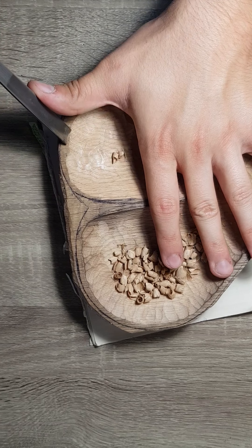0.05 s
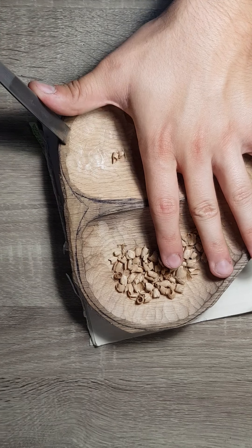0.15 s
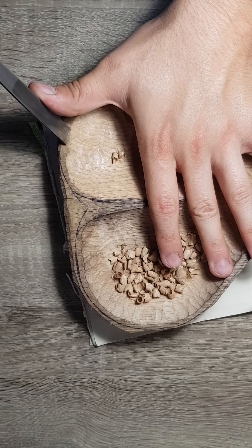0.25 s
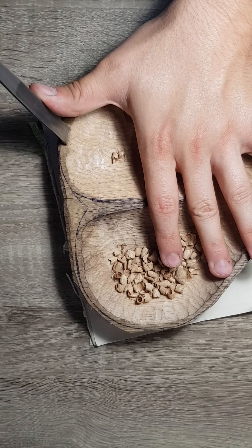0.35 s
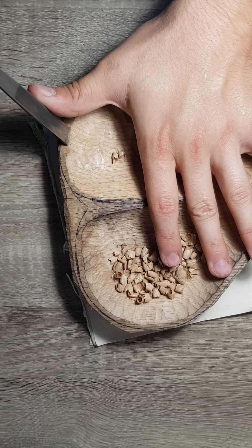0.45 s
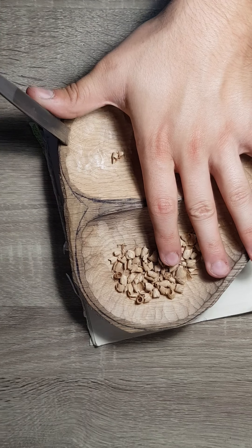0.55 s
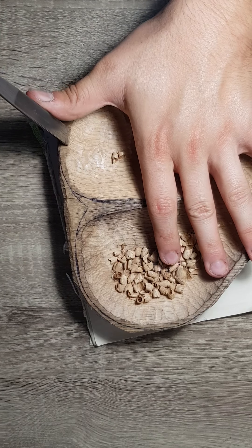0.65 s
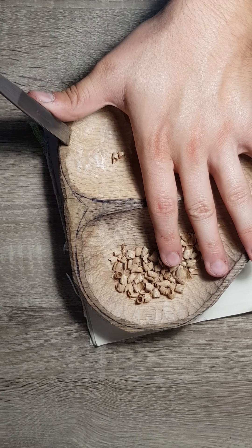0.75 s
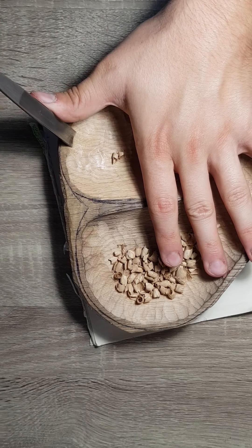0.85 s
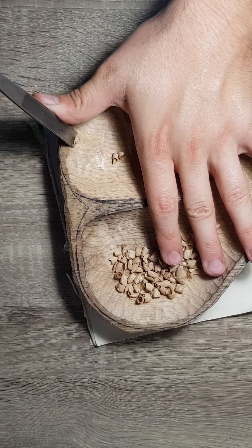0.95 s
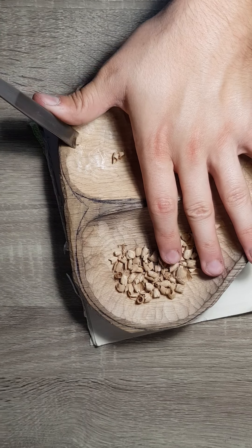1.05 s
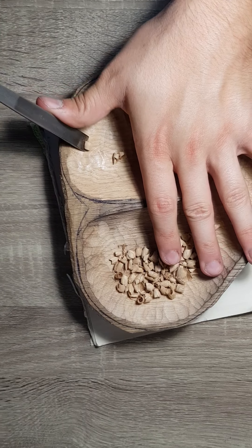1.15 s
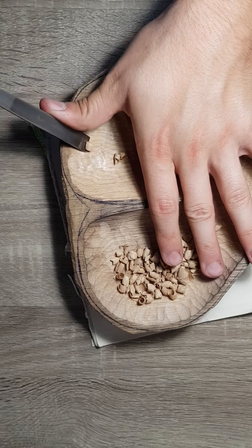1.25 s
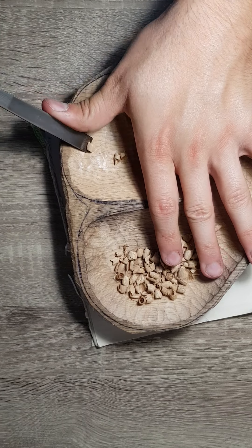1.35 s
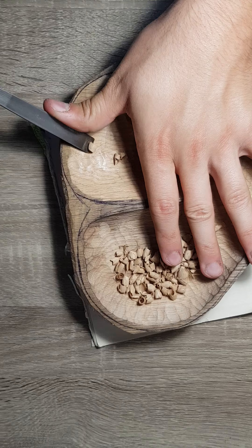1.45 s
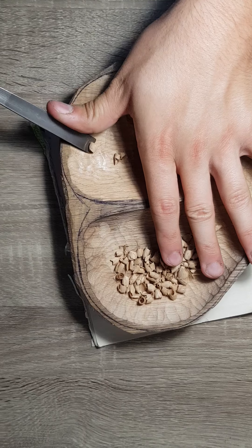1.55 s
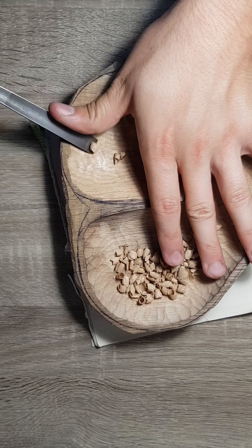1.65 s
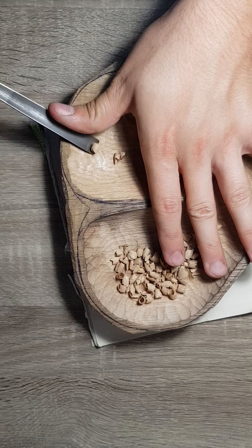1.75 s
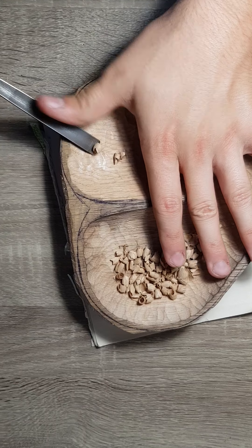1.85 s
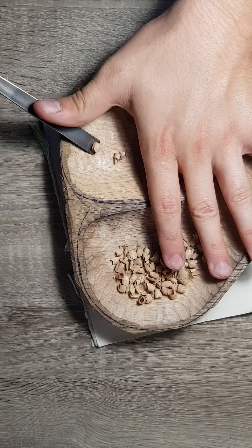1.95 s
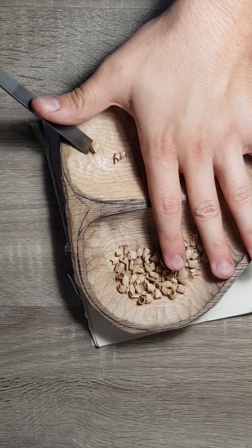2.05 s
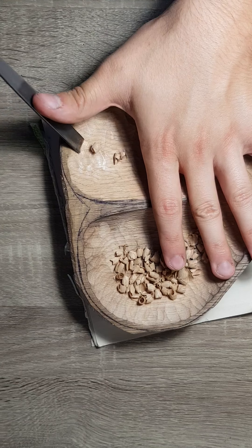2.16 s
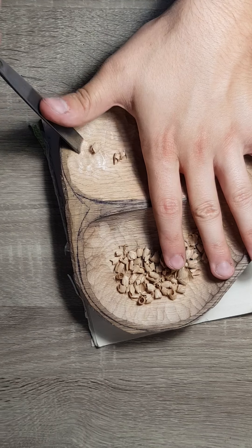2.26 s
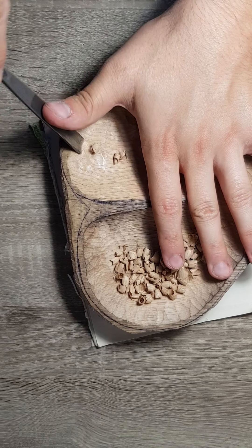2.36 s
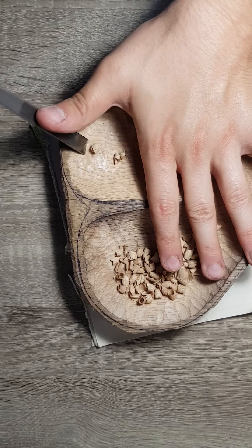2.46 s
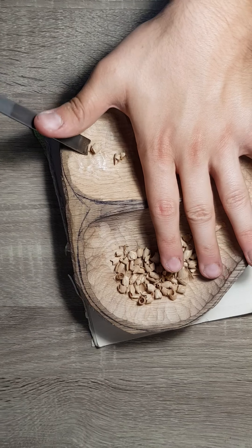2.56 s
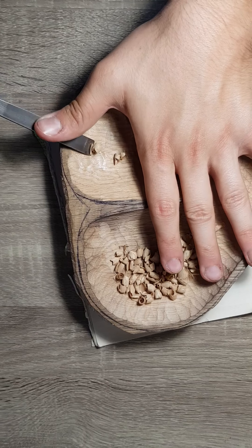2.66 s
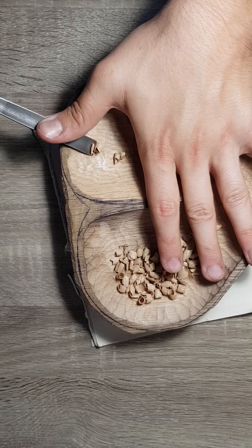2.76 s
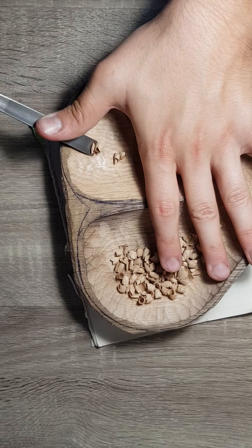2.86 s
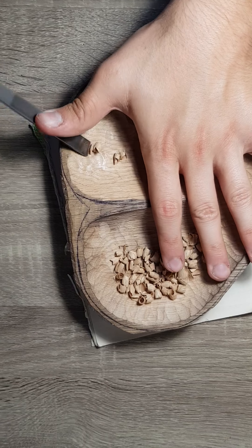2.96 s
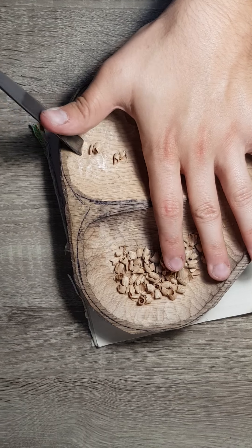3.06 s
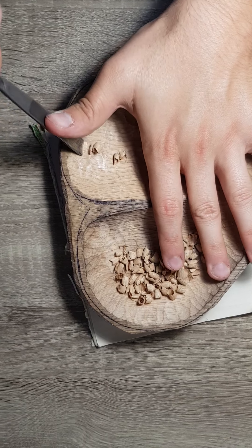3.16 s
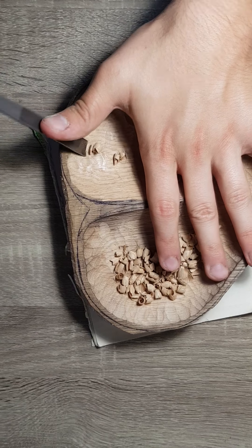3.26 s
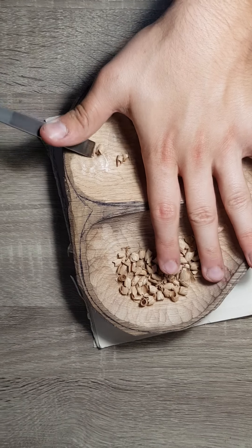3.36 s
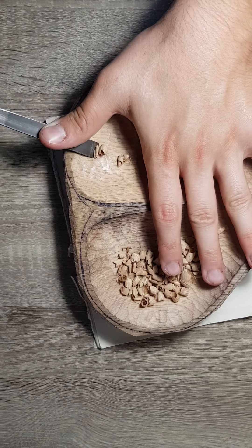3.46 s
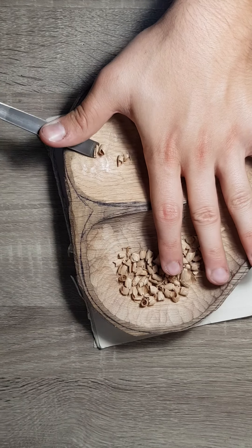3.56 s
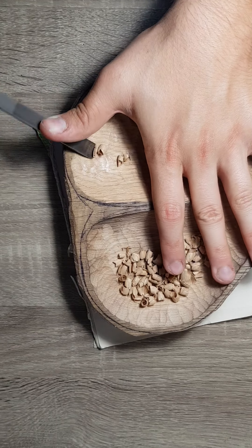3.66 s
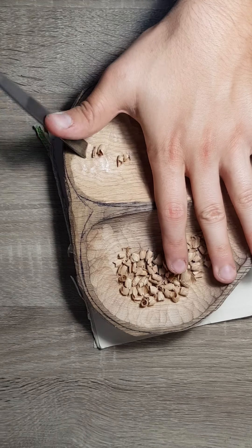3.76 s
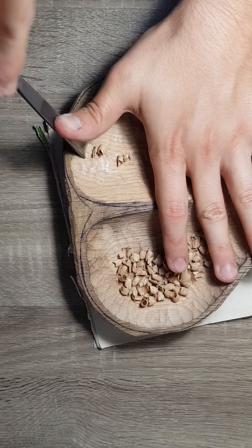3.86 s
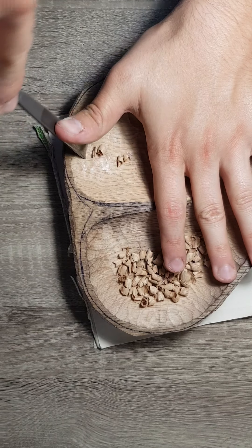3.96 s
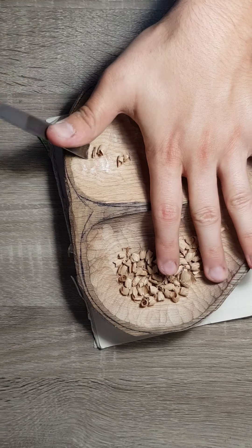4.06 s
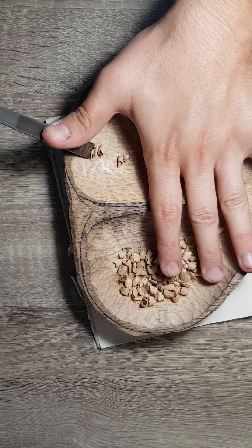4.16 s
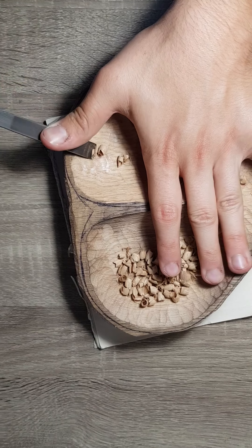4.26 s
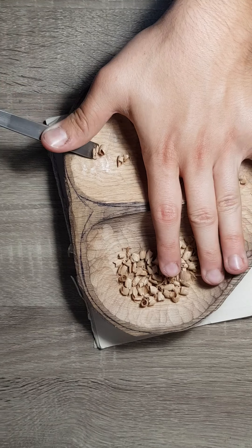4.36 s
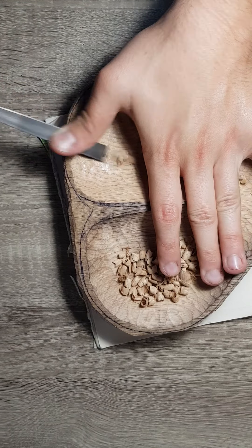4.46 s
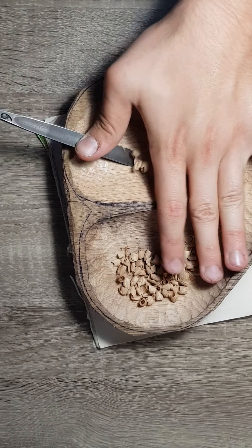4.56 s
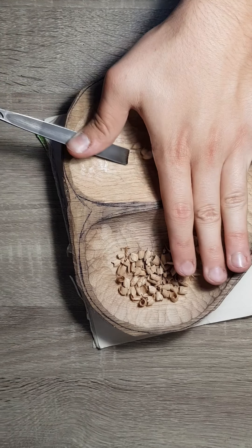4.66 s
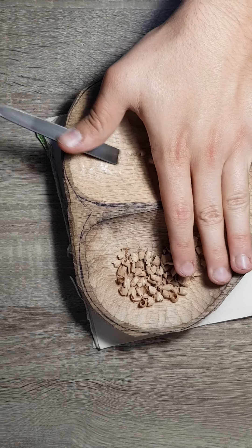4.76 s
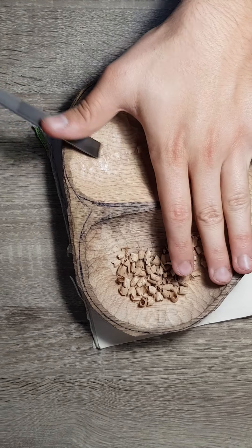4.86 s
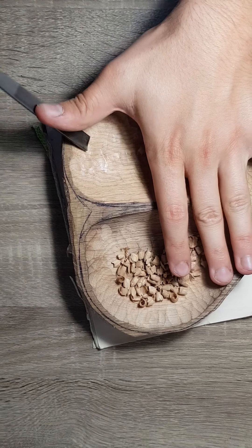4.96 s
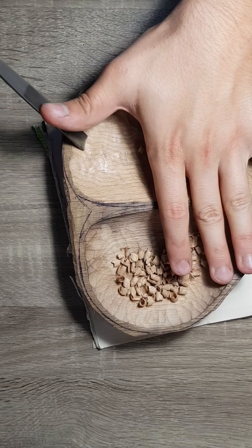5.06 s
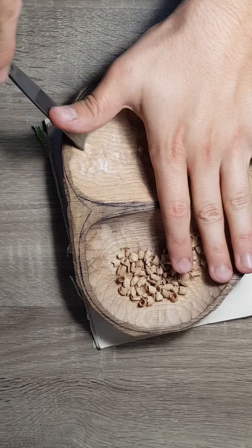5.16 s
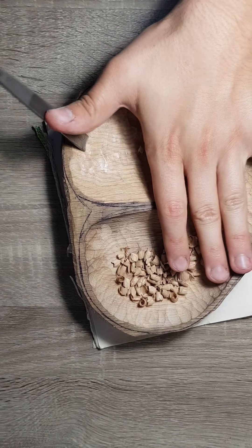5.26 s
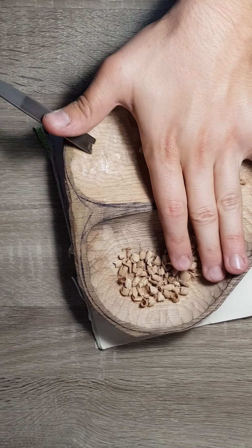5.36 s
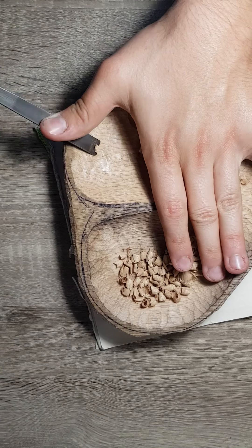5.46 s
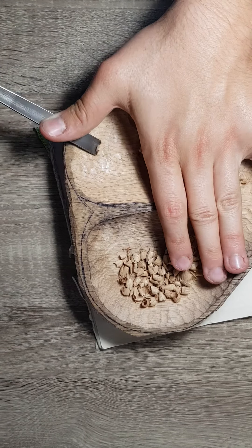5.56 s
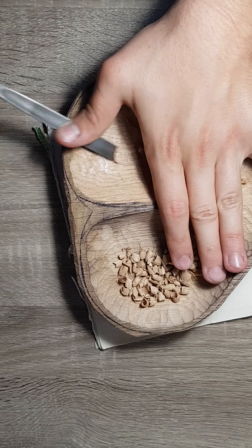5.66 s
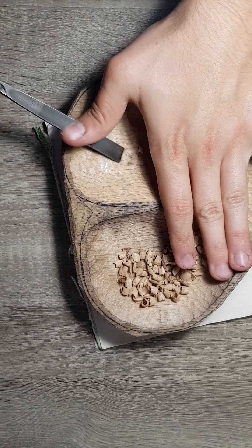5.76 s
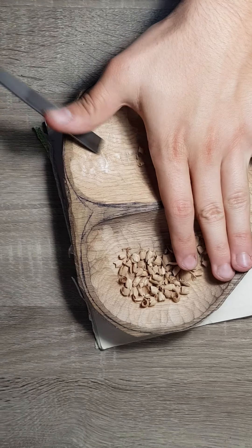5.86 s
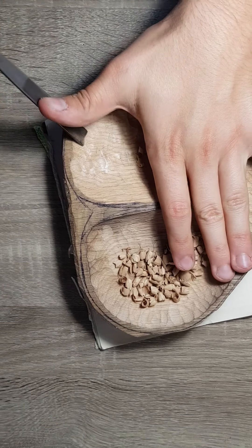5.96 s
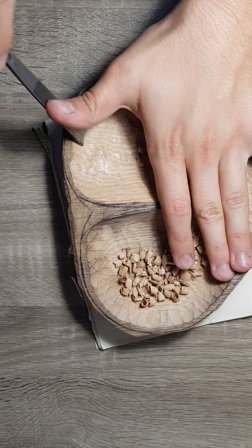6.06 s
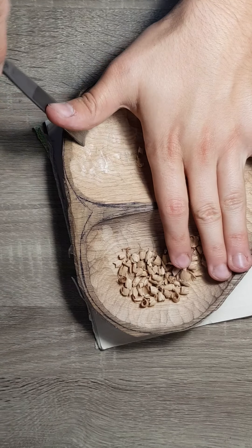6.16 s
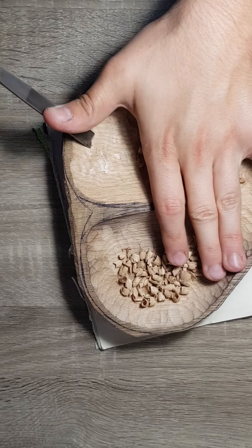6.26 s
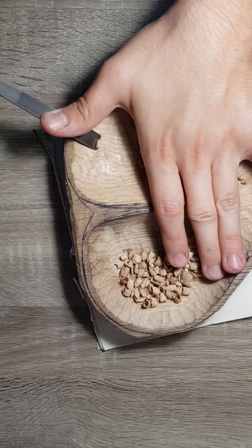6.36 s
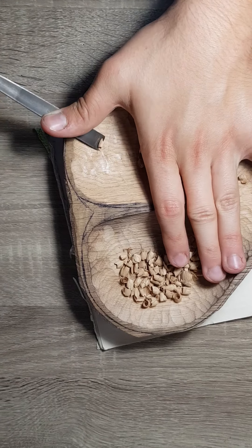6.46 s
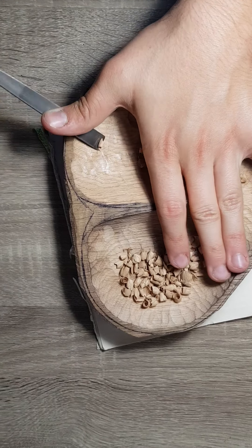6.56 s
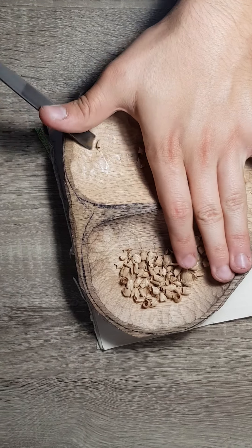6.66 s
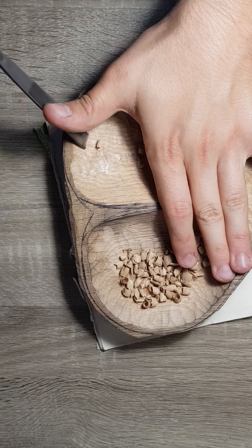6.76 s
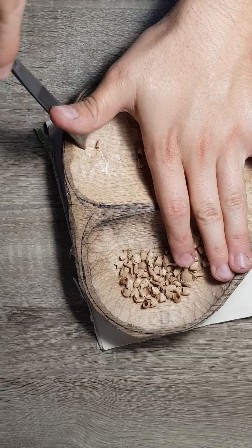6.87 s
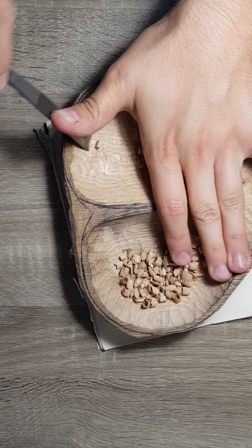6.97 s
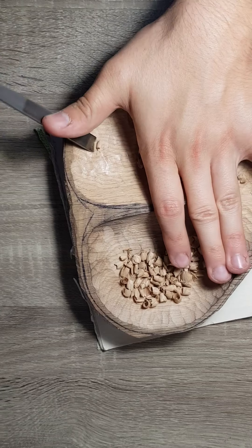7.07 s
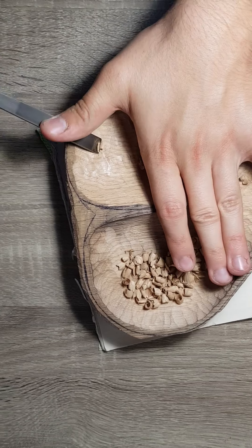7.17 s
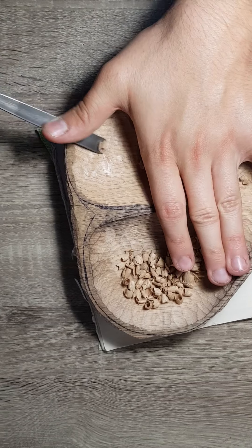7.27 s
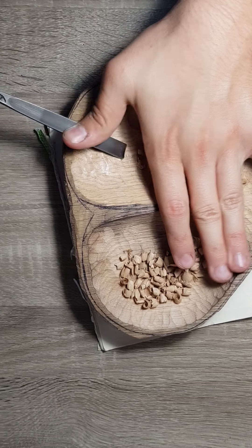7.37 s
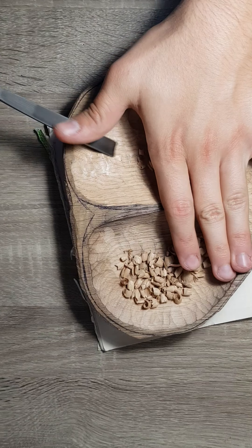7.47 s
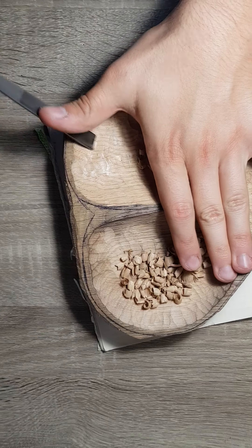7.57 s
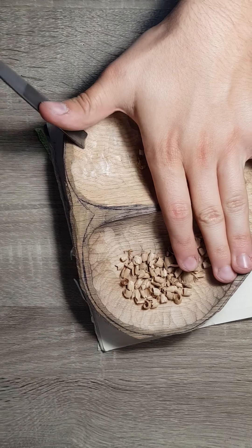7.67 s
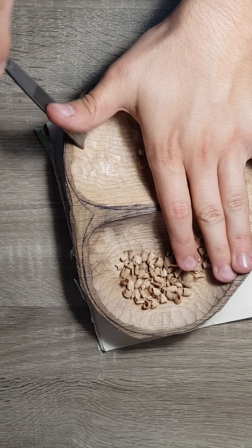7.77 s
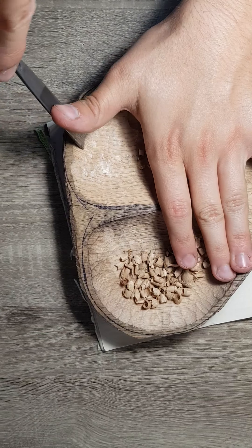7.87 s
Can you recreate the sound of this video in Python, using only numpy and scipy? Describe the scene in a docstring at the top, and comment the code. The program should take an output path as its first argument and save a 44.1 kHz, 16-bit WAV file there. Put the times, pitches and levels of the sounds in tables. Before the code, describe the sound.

A hand-pushed gouge bites into a wooden blank with hollow, crunchy thunks, then scattered rasping pushes and small steel ticks in a quiet room.

```python
"""In a small quiet room a hand-pushed gouge works a wooden bowl blank on a table top, close to a phone's two mics.
A run of heavy jolts comes first, from 0.8 to 1.5 s: blows ring the hollow table's modes, noise bursts crack fibres.
From 2.4 s there are scattered pushes with rasping slips; from 3 s the steel shank ticks and sings as ringing modes.
Hiss creeps up to 4.2 s; taps crowd near 4.8 s, the strongest rasps follow 5.3 s, and more taps come near the end.
Each push is a level curve; decaying noise makes the room's answer, steady filtered noise its rumble and the hiss."""
import sys
import numpy as np
from scipy import signal
from scipy.fft import rfft, irfft
from scipy.io import wavfile
from scipy.ndimage import uniform_filter1d, map_coordinates

SR = 44100
rng = np.random.default_rng(int(sys.argv[2]) if len(sys.argv) > 2 else 0)


def master_out(mix):
    """Clip the mix to full scale and print it as 16-bit PCM to the path in sys.argv[1]."""
    frames = np.transpose(np.atleast_2d(mix))
    ceiling = np.clip(frames, -1, 1)
    pcm = np.round(ceiling * 32767).astype(np.int16)
    wavfile.write(sys.argv[1], SR, pcm)


N = 349272  # samples, 7.92 s

# Jolts of the edge, close to the mics.
# Each row: start in seconds, crack level in dB, thump level in dB, splinter level in dB.
JOLTS = [(0.8, -50, -41.5, -101), (0.84, -38, -21, -70), (0.861, -35.5, -15, -62),
         (0.899, -33.5, -11.5, -61), (0.91, -33.5, -9.5, -57.5), (0.936, -39.5, -8.5, -61),
         (1.092, -25, -1.5, -56), (1.113, -27.5, -14, -57), (1.134, -33, -9, -55.5),
         (1.165, -28, -5, -48.5), (1.192, -22, -6, -50), (1.217, -31.5, -18, -66.5),
         (1.328, -31.5, -10.5, -62.5), (1.485, -49.5, -46, -104), (1.546, -51, -65.5, -100),
         (1.886, -71.5, -52, -94), (2.118, -60.5, -45, -96.5), (2.477, -50, -28.5, -66),
         (2.503, -41, -17, -57.5), (2.559, -41, -35, -67), (2.999, -65, -39, -94.5),
         (3.252, -54, -18, -60.5), (3.341, -42.5, -36, -67), (3.549, -50.5, -64.5, -75),
         (4.128, -32.5, -8, -53), (4.143, -36, -10.5, -61), (4.307, -44, -35, -47.5),
         (4.325, -51, -38, -53), (4.492, -43.5, -52, -54), (4.536, -40, -35.5, -59),
         (4.584, -41, -24, -55.5), (5.342, -42.5, -15, -58), (5.362, -39, -13, -55),
         (5.41, -44.5, -24.5, -61), (5.465, -42.5, -29.5, -60.5), (5.625, -40, -30, -54.5),
         (5.728, -80, -23.5, -69), (6.243, -32.5, -23.5, -54.5), (6.257, -51, -16, -70),
         (6.331, -55.5, -12.5, -70), (6.682, -55.5, -31, -89), (7.01, -40, -25, -58),
         (7.027, -43, -27, -61), (7.071, -39.5, -18, -65), (7.316, -36, -26.5, -64),
         (7.364, -38, -16.5, -62), (7.874, -57, -41.5, -101)]
# Modes of table top and blank. Each row: pitch in Hz, relative level in dB before tilt, 60 dB decay in seconds.
TABLE_MODES = [(64.09, 2.5, 0.83), (86, -5.5, 0.79), (130.78, 3.5, 0.37), (154, 4.5, 0.096),
               (201.1, -5, 0.16), (288.5, -6, 0.08), (347.6, -3, 0.085), (396.7, -4, 0.13),
               (235.3, -4, 0.08), (592, -5, 0.028), (730.4, -14.5, 0.069), (1000, -11.5, .04)]
CONTACT_MS = 1.647  # for a jolt that thumps 19 dB above its crack
BLOW_DB_PER_OCTAVE = 2.5  # a blow wakes the blank's higher modes more than rocking does
TABLE_LOW_HZ = 95


def table(load_db):
    """Short blows and small rocking slips drive the same modes; each blow lands elsewhere and weighs them anew."""
    out = np.zeros(N)
    weights = rng.standard_normal((len(JOLTS), len(TABLE_MODES)))
    for (s, crack_db, thump_db, _), weight in zip(JOLTS, weights):
        # a jolt that cracks more than it thumps is a harder, shorter contact
        contact_ms = CONTACT_MS * undb(-.2 * (crack_db - thump_db + 19.0))
        push = np.hanning(int(contact_ms * SR / 1000) + 3)
        modes = [(hz, db + 2.3 * w + BLOW_DB_PER_OCTAVE * np.log2(hz), t60)
                 for (hz, db, t60), w in zip(TABLE_MODES, weight)]
        blow = signal.fftconvolve(push, ring(modes))
        first_10ms = blow[:SR // 100]
        add(out, s, -undb(thump_db) * blow / np.sqrt(np.mean(first_10ms ** 2)))
    slips = colour(grains(350, 3.0), [(300, 15.0), (1000, -10.0)])
    rocking = unit(signal.fftconvolve(slips, ring(TABLE_MODES))[:N])
    out += undb(load_db) * rocking
    # a table top is too small to radiate deep bass
    return signal.sosfilt(signal.butter(3, TABLE_LOW_HZ, "high", fs=SR, output="sos"), out)


# Spectrum of tearing wood. Each row: frequency in Hz, relative density in dB per Hz.
FIBRE = [(300, -15.5), (600, -2), (1020, -8), (1270, -16), (1600, -15.5), (2500, -18.5), (5500, -32),
         (11000, -45), (15800, -47)]
SPLIT_HZ = 8500  # cracks below, splinters above


def fibres(rasp_db):
    """Each jolt is a few ms of tearing, splinters at the top; dense slips rasp between and shake the shank."""
    t = np.arange(SR // 20) / SR
    envelope = np.clip(t / 0.0054, 0, 1) * np.exp(-t / 0.0013)
    bursts = rng.standard_normal((len(JOLTS), len(t))) * envelope
    low, high = (signal.butter(4, SPLIT_HZ, kind, fs=SR, output="sos") for kind in ("low", "high"))
    cracks = np.zeros(N)
    for (s, crack_db, _, splinter_db), burst in zip(JOLTS, bursts):
        tear = colour(burst, FIBRE)
        for sos, db in ((low, crack_db), (high, splinter_db)):
            part = signal.sosfilt(sos, tear)
            first_5ms = part[:SR // 200]
            add(cracks, s, undb(db) * part / np.sqrt(np.mean(first_5ms ** 2)))

    # the edge chatters: it sticks and lets go some forty times a second, more so the deeper it cuts
    chatter = np.minimum(walk(88), 1.7)
    depth_db = np.clip(5 + .3 * (rasp_db + 53), 2, 6)
    slips = undb(depth_db * chatter) * grains(2500, 2)
    shank_modes = [(hz, db, SHANK_T60_S) for hz, db in SHANK_MODES]
    steel = signal.fftconvolve(slips, ring(shank_modes))[:N]
    # small slips are thinner than whole cracks
    scrape = unit(colour(colour(slips, FIBRE), [(700, -11.0), (5000, -0.5)]))
    # the grain of the wood changes: each octave of the tearing comes and goes on its own
    change = np.zeros(N)
    for hz in (500, 1000, 2000, 4000):
        octave = signal.butter(2, (hz, 2 * hz), "band", fs=SR, output="sos")
        change += (undb(3 * walk(30) - 1) - 1) * signal.sosfilt(octave, scrape)
    scrape = scrape + change
    # slips splinter more when the edge digs in
    splinters = undb(.3 * (rasp_db + 51.0)) * signal.sosfilt(high, scrape)
    # a light slide rings the steel more than a deep cut
    sliding = undb(np.minimum(-12.5 - 0.95 * (rasp_db + 56.0), -3.0))
    rasp = signal.sosfilt(low, scrape) + splinters + sliding * unit(steel)
    return cracks + undb(rasp_db) * rasp


# Pushes of the gouge across the blank.
# Each row: start of full pressure in seconds, length in seconds, table load in dB, rasp of the edge in dB,
# swell over the push in dB.
STROKES = [(0.847, 0.19, -22, -66, -3), (1.123, 0.12, -13, -63.5, 1.5), (1.355, 0.3, -36.5, -72, -6.5),
           (2.405, 0.08, -43.5, -72, 0), (2.488, 0.23, -29, -56.5, -9.5), (3.248, 0.18, -30.5, -58.5, -1.5),
           (3.977, 0.17, -47, -63, 12.5), (4.133, 0.072, -17.5, -55.5, -4), (4.301, 0.13, -52, -58, -12.5),
           (4.498, 0.17, -25, -57, -3.5), (4.794, 0.118, -36.5, -64.5, -5.5), (5.352, 0.14, -19, -49, -8),
           (5.627, 0.11, -25, -53.5, -7), (5.834, 0.054, -39.5, -73, 7), (5.959, 0.026, -35.5, -59.5, -3.5),
           (6.239, 0.21, -23, -52, -2.5), (6.682, 0.042, -39, -73, 1.5), (6.992, 0.14, -27.5, -51, 1),
           (7.076, 0.034, -12.5, -56.5, -1.5), (7.285, 0.097, -23.5, -56, 2.5),
           (7.468, 0.19, -33, -64.5, -7)]
BITE_DB_PER_S = 445.5  # pressure builds before each push


def pushes(t, levels_db, fall_db_per_s, rest_db):
    """Level in dB of all pushes over the resting hands: pressure builds, holds with a swell and falls."""
    power = undb(2 * rest_db)
    for (s, length, _, _, swell_db), db in zip(STROKES, levels_db):
        held = db + swell_db * np.clip((t - s) / length, 0, 1)
        build = BITE_DB_PER_S * np.maximum(s - t, 0)
        fall = fall_db_per_s * np.maximum(t - s - length, 0)
        power = power + undb(2 * (held - build - fall))
    return 10 * np.log10(power)


# Steel shank touching wood. Each row: start in seconds, peak level in dB, favoured pitch in Hz.
TICKS = [(3.0, -51.5, 2280), (3.704, -51.5, 1460), (4.435, -39, 2330), (4.781, -44.5, 650),
         (4.809, -35, 540), (4.838, -42.5, 670), (4.94, -43.5, 795), (4.962, -43, 950),
         (5.143, -60.5, 1500), (5.206, -44.5, 2170), (5.705, -39.5, 2350), (5.934, -30.5, 776),
         (6.16, -55.5, 1620), (7.503, -44, 1380), (7.548, -47.5, 660), (7.592, -36.5, 750),
         (7.619, -37, 970)]
# Modes of the shank, damped by the hand. Each row: pitch in Hz, relative level in dB.
SHANK_MODES = [(720, 11.5), (1020, 1.5), (1600, 8), (2380, 5.5), (3300, -2.5), (4900, 0)]
# Steel sliding lightly over wood. Each row: start in seconds, length in seconds, pitch in Hz, level in dB.
SLIDES = [(3.958, .05, 1410, -70.5), (3.94, .17, 5100, -66), (4.05, 0.094, 1000, -56.5),
          (5.22, 0.078, 2060, -73), (5.84, 0.1, 4900, -72), (7.484, .18, 4720, -75.5)]
SHANK_T60_S, OFF_PITCH_DB_PER_OCTAVE = .012, 3


def shank():
    """Scuffing taps ring hand-damped steel, most at a pitch set by grip and place; light slides make it sing."""
    out = np.zeros(N)
    chance = rng.standard_normal((len(TICKS), len(SHANK_MODES), 2))
    t = np.arange(SR // 10) / SR
    envelope = np.clip(t / 0.00186, 0, 1) * (np.exp(-t / 0.0013) + 0.093 * np.exp(-t / 0.013))
    scuffs = rng.standard_normal((len(TICKS), len(t))) * envelope
    for (s, db, pitch_hz), draws, scuff in zip(TICKS, chance, scuffs):
        modes = [(pitch_hz, 9.0, 0.018)]
        for (hz, mode_db), (detune, lift) in zip(SHANK_MODES, draws):
            hz = hz * (1 + .015 * detune)
            off_pitch_db = OFF_PITCH_DB_PER_OCTAVE * abs(np.log2(hz / pitch_hz))
            modes.append((hz, mode_db + 2 * lift - off_pitch_db, SHANK_T60_S))
        tap = signal.fftconvolve(scuff, ring(modes)[:len(t)])
        add(out, s, undb(db) * tap / np.abs(tap).max())
    noises = rng.standard_normal((len(SLIDES), SR // 5))
    for (s, length, hz, db), noise in zip(SLIDES, noises):
        size = int(length * SR)
        rub = noise[:size] * np.hanning(size) ** .5
        band = ring([(hz, 0, 8 / hz + SHANK_T60_S / 2)])[:SR // 50]
        add(out, s, undb(db) * unit(signal.fftconvolve(rub, band)))
    return out


# Decay of the small room. Each row: frequency in Hz, 60 dB decay in seconds.
ROOM_T60 = [(300, 0.21), (1500, 0.45), (5000, 0.29)]


def room(x, db):
    """Diffuse tail of decaying noise, another for each port, its decay set band by band."""
    t, tails = np.arange(SR // 2) / SR, 0
    hz = np.arange(len(t) // 2 + 1) * SR / len(t)
    for centre in 60 * 2 ** np.arange(0, 8.1, .5):
        band = np.exp(-.5 * (np.log2(np.maximum(hz, 1) / centre) / .25) ** 2)
        noise = irfft(rfft(rng.standard_normal((2, len(t)))) * band, len(t))
        tails = tails + noise * np.exp(-np.log(1000) * t / on_log(ROOM_T60, centre))
    # table, hands and blank throw back a dense early burst
    tails = tails * np.clip(t / 0.003, 0, 1) * (1 + 4.1 * np.exp(-t / 0.0053))
    tails = tails / np.sqrt(np.sum(tails ** 2) / 2)
    return undb(db) * signal.fftconvolve(x[None], tails, axes=1)[:, :N]


# Spectrum of the quiet room. Each row: frequency in Hz, relative density in dB per Hz.
STILL = [(25, 0.5), (161, -6.5), (269, -22.5), (2890, -33), (7420, -39), (15800, -31.5)]
# Microphone hiss at the top, creeping up. Each row: time in seconds, level in dB.
HISS = [(0, -96), (2.3, -90), (4.2, -76), (7.92, -76)]
STILL_DB = -67.5


def stillness():
    """Room rumble, shared by both ports most in the bass; treble hiss separate in each."""
    t = np.arange(N) / SR
    mid, side, left, right = rng.standard_normal((4, N))
    apart = colour(colour(side, STILL), [(80, -8), (600, 0.0)])
    air = colour(mid, STILL) + apart * np.array([[1], [-1]])
    top = [(8000, -32.5), (12000, -8.5)]
    hiss = unit(np.array([colour(left, top), colour(right, top)]))
    hiss_db = np.interp(t, *np.transpose(HISS))
    return undb(STILL_DB) * unit(air) + undb(hiss_db) * hiss


def undb(db):
    """Decibels to amplitude."""
    return 10 ** (np.asarray(db) / 20)


def unit(x):
    """Scale to rms 1."""
    return x / np.sqrt(np.mean(x ** 2))


def on_log(points, hz):
    """Read (Hz, value) points on a log-frequency axis."""
    f, v = np.transpose(points)
    return np.interp(np.log(np.maximum(hz, 1)), np.log(f), v)


def colour(x, points, share=1):
    """Causal filter with share times the dB gain of (Hz, dB) points, from the folded cepstrum."""
    size = 8192
    gain_db = share * on_log(points, np.arange(size // 2 + 1) * SR / size)
    cepstrum = irfft(gain_db * np.log(10) / 20)
    cepstrum[1:size // 2] *= 2
    cepstrum[size // 2 + 1:] = 0
    response = irfft(np.exp(rfft(cepstrum)))[:size // 2]
    return signal.fftconvolve(x, response)[:len(x)]


def ring(modes):
    """Response of decaying modes (Hz, dB, t60 in s) to one blow, peak 1."""
    t = np.arange(SR // 2) / SR
    h = sum(undb(db) * np.sin(2 * np.pi * hz * t) * np.exp(-np.log(1000) * t / t60) for hz, db, t60 in modes)
    return h / np.abs(h).max()


def add(track, s, shape):
    """Mix a shape in at time s."""
    i = int(s * SR)
    track[i:i + len(shape)] += shape[:N - i]


def grains(rate, spread_db):
    """Random slips of random sign, rate a second, a few far larger than the rest; rms 1."""
    when, sign, size = rng.random(N), rng.standard_normal(N), rng.exponential(size=N)
    return unit((when < rate / SR) * sign * undb(spread_db * np.minimum(size, 4)))


def walk(rate):
    """Random levels held 1 / rate s and slewed; spread near 1."""
    k = int(SR / rate)
    held = np.repeat(rng.standard_normal(N // k + 1), k)
    return uniform_filter1d(held, k // 2)[:N]


# Hands resting on the blank. Each row: time in seconds, table load in dB.
RESTING = [(0, -50.5), (.3, -67), (.75, -92), (1.8, -63), (3.0, -53.5), (3.9, -43.5), (5.2, -52),
           (6.15, -82), (7.92, -55.5)]
# Balance of the two microphone ports. Each row: frequency in Hz, left minus right in dB.
PORTS = [(200, 0), (380, -4), (1300, 2), (2400, -2), (5000, 3), (8500, 12), (15000, 7)]
RESTING_RASP_DB = -100
LOAD_FALL_DB_PER_S, RASP_FALL_DB_PER_S = 105.5, 204.5  # the table settles slowly, the edge lifts quickly
ROOM_DB, TABLE_ROOM_DB = 4, -13
RIGHT_LAG_S, LAG_WANDER_S = .00042, .00015


def scene():
    """Gouge, table and room reach the two ports over the stillness."""
    t = np.arange(N) / SR
    _, _, load_db, rasp_db, _ = np.transpose(STROKES)
    resting_db = np.interp(t, *np.transpose(RESTING))
    thud = table(pushes(t, load_db, LOAD_FALL_DB_PER_S, resting_db))
    crisp = fibres(pushes(t, rasp_db, RASP_FALL_DB_PER_S, RESTING_RASP_DB)) + shank()
    # the edge is nearer the left port; the table top reaches both at once
    lag_s = RIGHT_LAG_S + LAG_WANDER_S * uniform_filter1d(walk(3), SR // 4)
    late = map_coordinates(crisp, [np.arange(N) - lag_s * SR], mode="nearest")
    # the edge moves about the blank, and every place has another echo
    turn = 2 * np.pi * 1.3 * t
    echoes = sum(room(crisp * place, ROOM_DB) for place in (np.cos(turn), np.sin(turn)))
    table_echo = room(colour(thud, [(150, -6), (450, 6.0)]), TABLE_ROOM_DB)
    left, right = thud + np.array([crisp, late]) + echoes + table_echo
    return np.array([colour(left, PORTS, .5), colour(right, PORTS, -.5)]) + stillness()


# Dip of the microphone ports. Each row: frequency in Hz, gain in dB.
NOTCH = [(6300, -3), (8600, -19), (10000, -4.5)]
TOP_HZ = 15800


def record(dry):
    """The ports dip in the upper treble; the phone cuts the top steeply."""
    heard = np.array([colour(x, NOTCH) for x in dry])
    return signal.sosfilt(signal.ellip(10, .2, 80, TOP_HZ, fs=SR, output="sos"), heard)


dry = scene()
out = record(dry)
master_out(out)
```